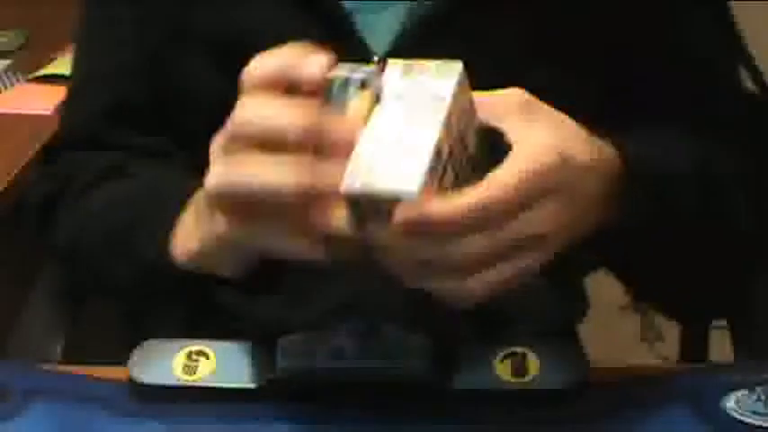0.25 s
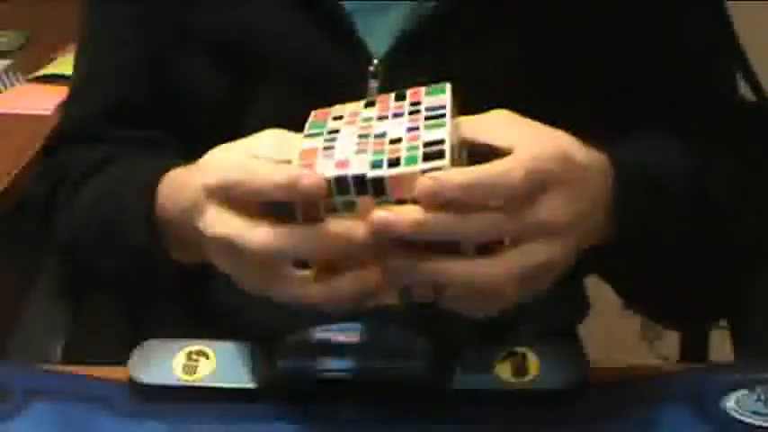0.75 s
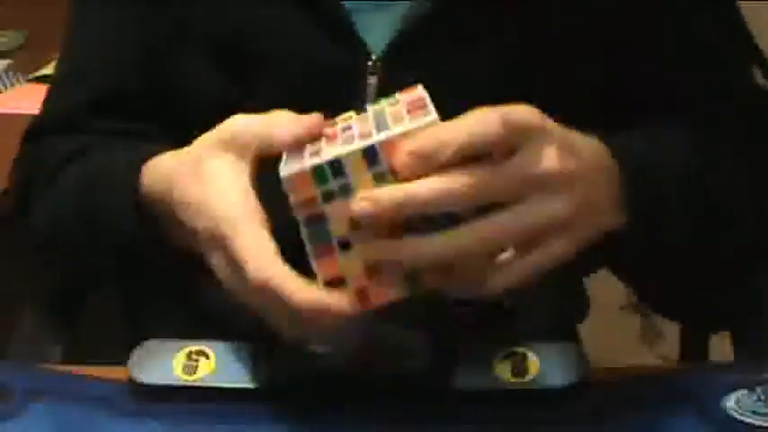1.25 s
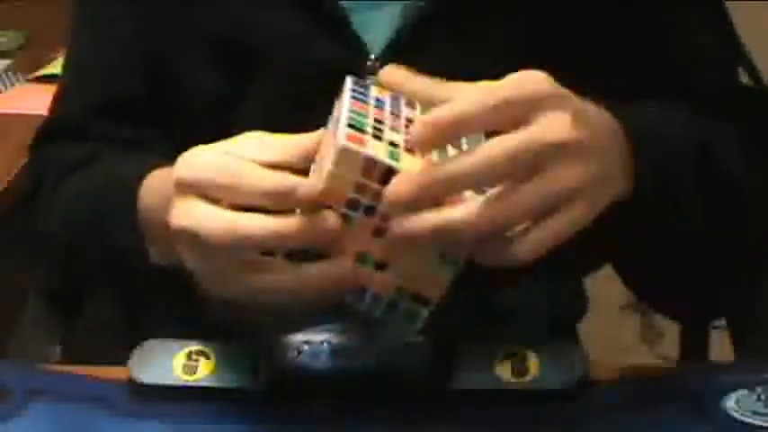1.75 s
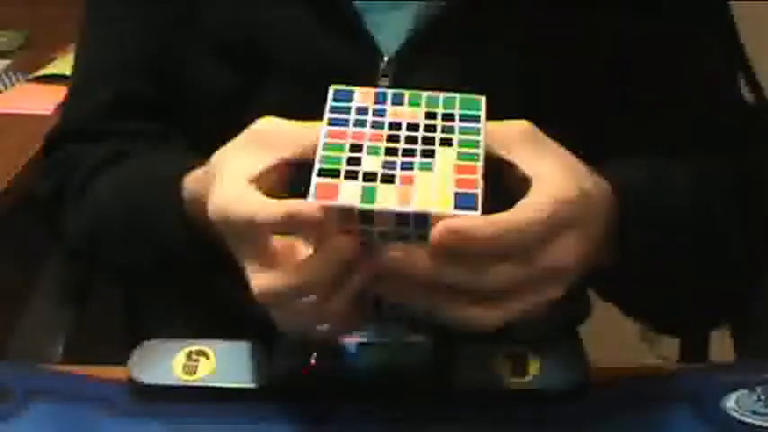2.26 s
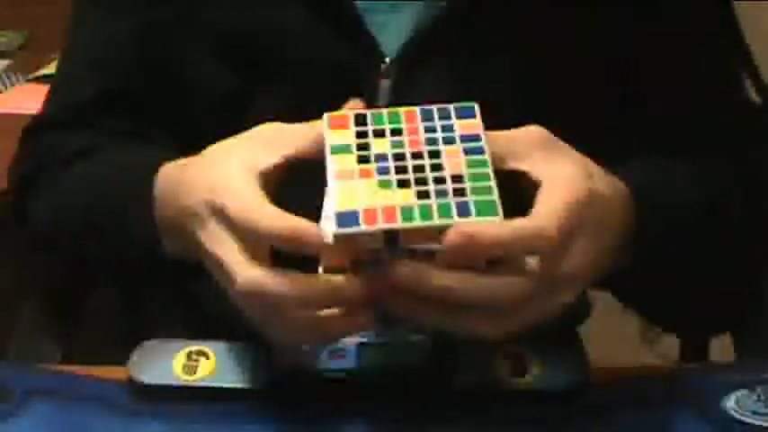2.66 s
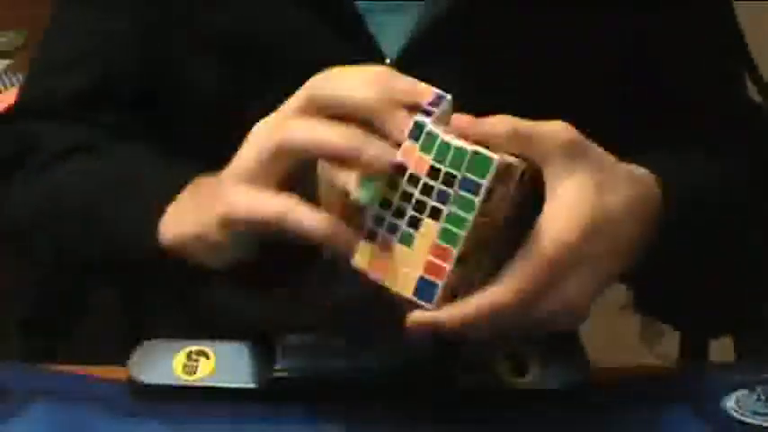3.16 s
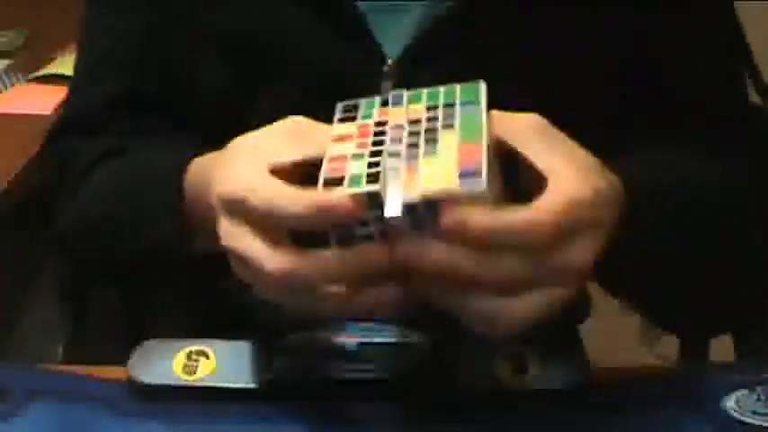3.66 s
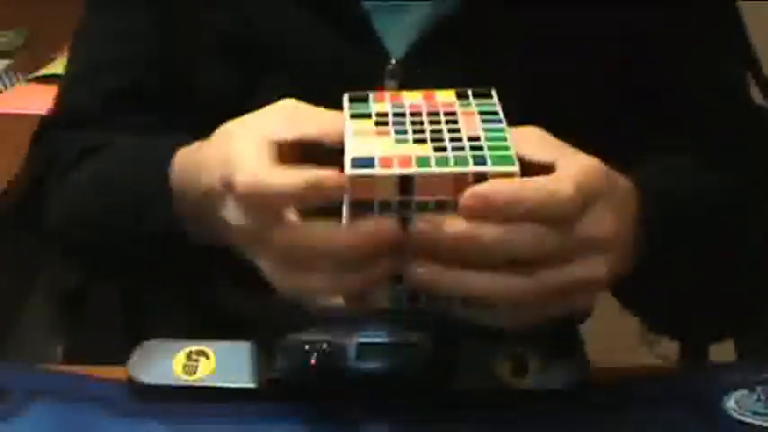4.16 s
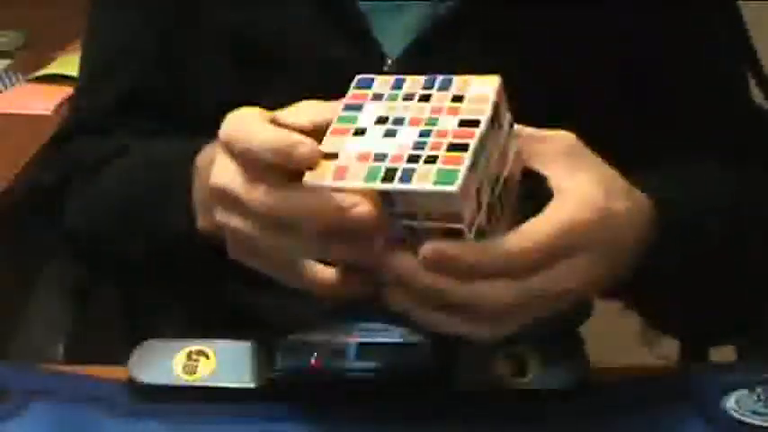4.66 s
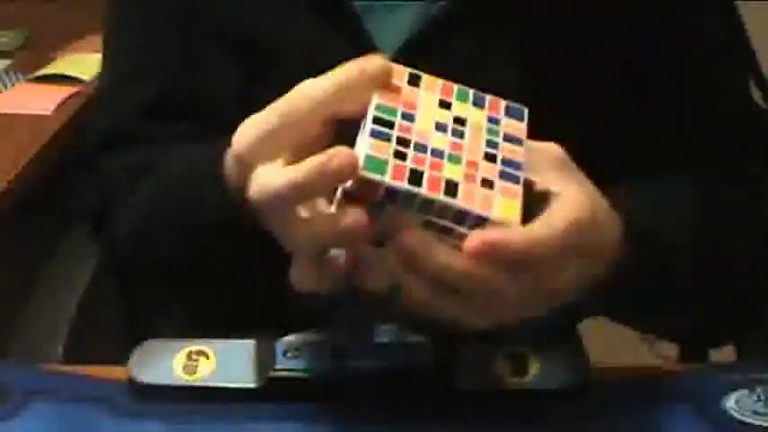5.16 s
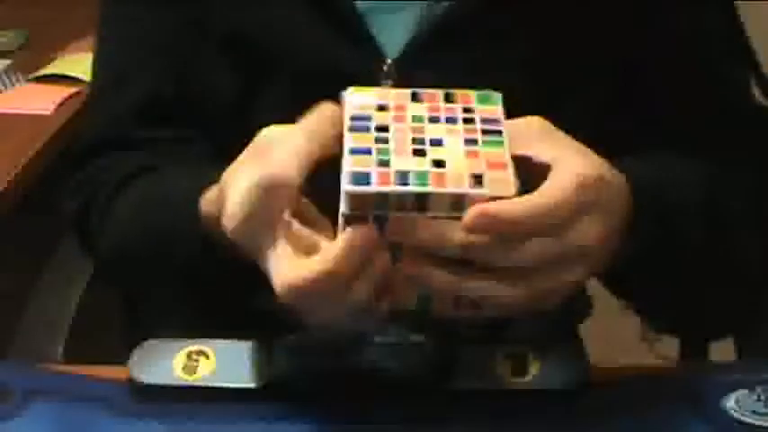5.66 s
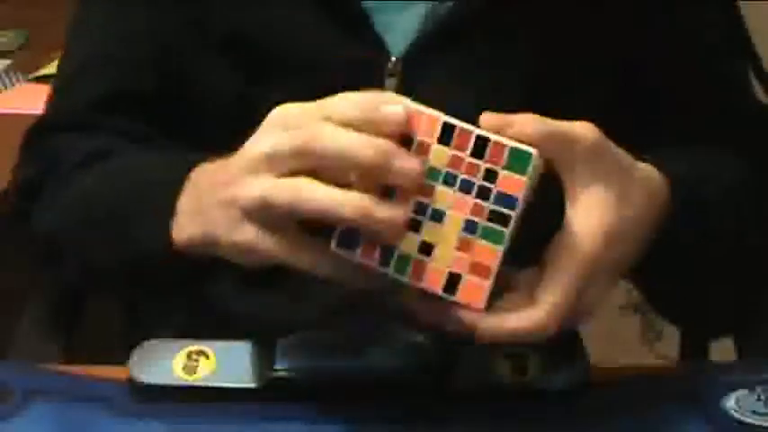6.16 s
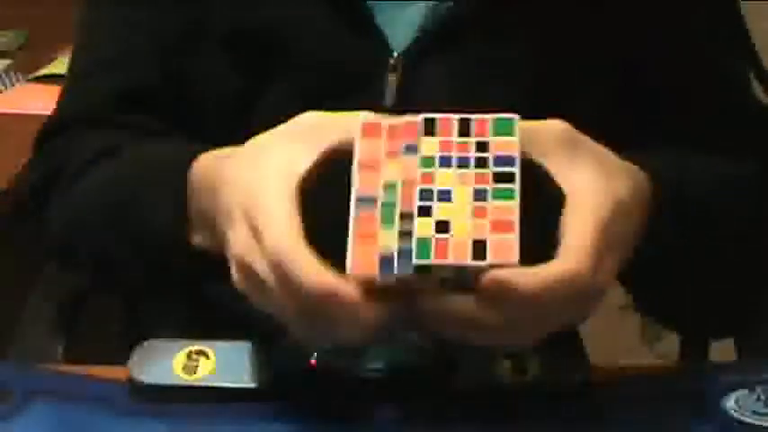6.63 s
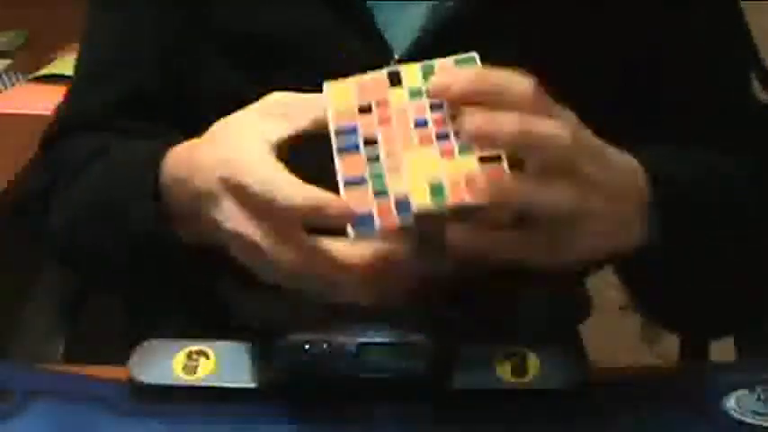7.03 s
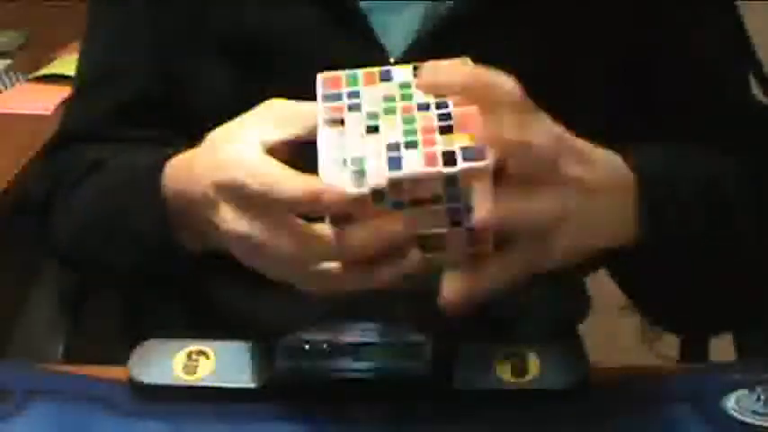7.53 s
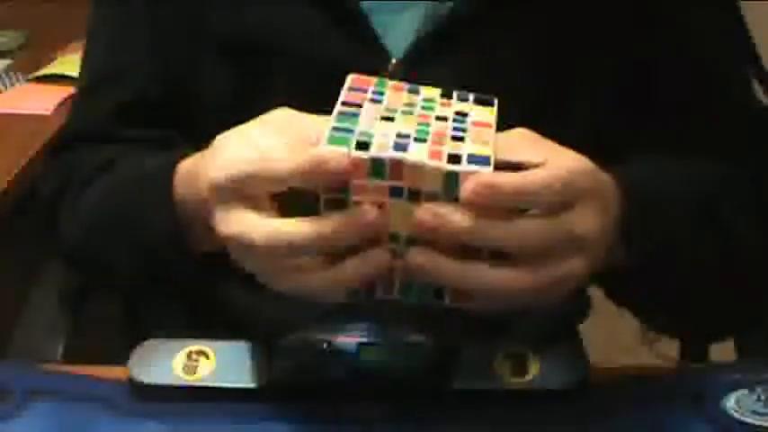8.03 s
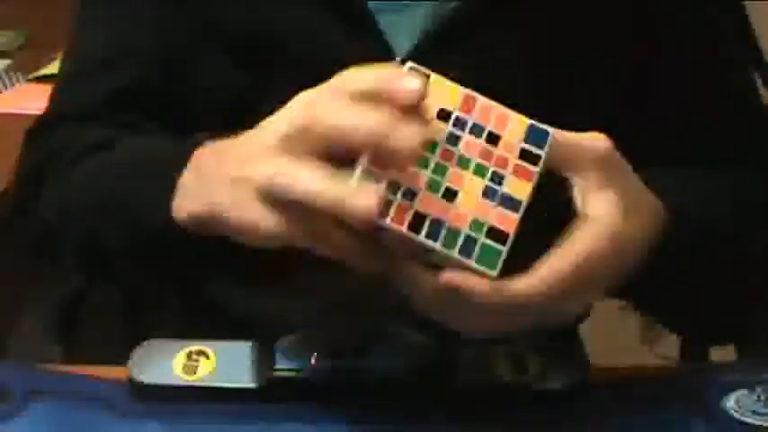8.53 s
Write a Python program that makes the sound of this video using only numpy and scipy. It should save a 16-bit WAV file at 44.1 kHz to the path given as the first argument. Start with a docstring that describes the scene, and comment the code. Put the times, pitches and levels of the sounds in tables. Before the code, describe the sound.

A large hollow plastic puzzle cube is twisted quickly by hand, close to the microphone in a small quiet room with a short reverberation. A dull footstep-like thud on a wooden floor opens the scene; others follow irregularly, mostly fainter, ending after about 5.4 s. From 0.14 s, layers slide with dense grainy rattles, and pieces snap home in dry clicks, strong around 0.6 s and 1.5 s, with paired clacks at 2.5 and 2.9 s. A bright flurry at 3.2-3.5 s holds the hardest snap. More bursts come around 4.1-4.4, 5.2 and 5.5-5.8 s, with short lulls between, then 6.4-6.8 s. From 6.8 to 8.2 s only light, sparse ticks and faint jiggling remain. Two firm snaps follow near 8.5 and 8.8 s, the first brighter, the last duller. Low mains hum and soft, slowly sinking hiss continue throughout.

```python
"""A large plastic puzzle cube is twisted by hand in a small quiet room, over a mains hum and a slowly sinking hiss.
Dull thuds like footsteps on a wooden floor start at once, mostly grow fainter and stop after 5.4 s.
From 0.14 s sliding layers rattle as dense grains and pieces snap home as clicks, the hardest near 3.4 s;
6.8 to 8.2 s brings only light ticks, then two last firm snaps. Grains and clicks ring one bank of cube resonances."""
import sys
import numpy as np
from scipy import signal
from scipy.fft import rfft, irfft
from scipy.io import wavfile
from scipy.ndimage import uniform_filter1d

SR = 44100
rng = np.random.default_rng(int(sys.argv[2]) if len(sys.argv) > 2 else 0)


def elevation(decibels):
    """Turn decibel levels (scalar or array-like) into linear amplitude ratios."""
    levels = np.asarray(decibels, float)
    return 10 ** (levels / 20)


def file_out(sig):
    """Save sig as 16-bit WAV at sys.argv[1]."""
    # one column per channel
    cols = np.atleast_2d(sig).T
    # limit, then scale
    lim = np.clip(cols, -1, 1)
    pcm = np.round(lim * 32767).astype(np.int16)
    wavfile.write(sys.argv[1], SR, pcm)


N = 387638

# Layers turning. Each row: start in seconds, length in seconds before swell and run-out, rattle drive in dB,
# treble in dB against the turn's own middle range.
TURNS = [(0.142, 0.027, -44, 0), (0.226, 0.023, -38, -4), (0.357, 0.081, -23.5, 2.5),
         (0.562, 0.033, -31, -14), (0.719, 0.04, -36, -11), (0.955, 0.055, -39.5, -13),
         (1.062, 0.037, -28, -15), (1.119, 0.029, -32.5, -14), (1.232, 0.0076, -39.5, -4),
         (1.396, 0.022, -39.5, -5), (1.449, 0.085, -33, -1.5), (1.63, 0.025, -23.5, -12),
         (1.846, 0.026, -40.5, -5), (2.046, 0.009, -39, -8), (2.438, 0.044, -34.5, -12),
         (2.473, 0.04, -27.5, -19), (2.624, 0.02, -46, 1), (2.875, 0.034, -24.5, -23),
         (3.195, 0.058, -28, 1), (3.321, 0.03, -31, -1), (3.346, 0.058, -25, 2.5), (3.416, 0.041, -27, 3),
         (3.587, 0.028, -37, 5.5), (3.671, 0.023, -33, -6), (3.786, 0.064, -34, 0), (3.92, 0.037, -39, -11),
         (4.041, 0.018, -32.5, -1.5), (4.122, 0.072, -27.5, -5), (4.251, 0.054, -44, -4),
         (4.358, 0.067, -23, 3), (4.437, 0.034, -29.5, -6), (5.127, 0.05, -44, -9), (5.173, 0.043, -24, -4),
         (5.517, 0.041, -34, -19), (5.545, 0.055, -24, -6), (5.646, 0.012, -45.5, 3),
         (5.74, 0.011, -34.5, -7), (5.761, 0.042, -25, -14), (6.318, 0.032, -43.5, -8),
         (6.369, 0.01, -33, 7.5), (6.482, 0.073, -26.5, -1), (6.681, 0.028, -31, -1.5),
         (6.736, 0.02, -25.5, -2), (6.806, 0.082, -46.0, -17), (7.12, 0.011, -41.5, -16),
         (7.308, 0.0078, -51, -1), (7.546, 0.011, -50, 3), (7.647, 0.028, -42, -0.5),
         (7.932, 0.035, -45.5, -7), (8.282, 0.019, -49.5, -5.0), (8.431, 0.053, -34.5, -2),
         (8.461, 0.042, -26, -21), (8.723, 0.038, -37.5, -1), (8.746, 0.037, -25.5, -4)]


def rms_one(x):
    """Scale to rms 1."""
    return x / np.sqrt(np.mean(x ** 2) + 1e-20)


def at_hz(points, hz):
    """Read a curve of (Hz, value) points on a log-frequency axis."""
    point_hz, value = np.transpose(points)
    return np.interp(np.log(hz), np.log(point_hz), value)


def resonate(x, hz, width_hz):
    """Two-pole resonance, gain near 1 at its peak."""
    r = np.exp(-np.pi * width_hz / SR)
    b = np.array([1, 0, -1]) * (1 - r * r) / 2
    a = [1, -2 * r * np.cos(2 * np.pi * hz / SR), r * r]
    return signal.lfilter(b, a, x)


def dying(times_s, sizes, t60_s):
    """Envelope that jumps at each moment, then decays exponentially."""
    train = np.full(N, 1e-18)
    index = np.clip((np.asarray(times_s) * SR).astype(int), 0, N - 1)
    np.add.at(train, index, sizes)
    return signal.lfilter([1], [1, -elevation(-60 / (t60_s * SR))], train)


def drift(rate_hz):
    """Slow random wander of spread about 1."""
    points_per_s = 40
    count = int(N / SR * points_per_s) + 2
    slow = uniform_filter1d(rng.standard_normal(count), max(1, int(points_per_s / rate_hz)))
    return np.interp(np.linspace(0, count - 1, N), np.arange(count), rms_one(slow))


def sliding_power(levels_db, settle_db, rest_db):
    """Rattle power: each turn swells, holds, runs out and settles; the fingers never quite rest."""
    run_up_t60_s, run_out_t60_s, settle_t60_s = 0.046, 0.065, 1
    power = np.full(N, 1e-18)
    for (start_s, length_s, *_), db in zip(TURNS, levels_db):
        power[int(start_s * SR):int((start_s + length_s) * SR)] += elevation(db) ** 2
    t60_s = np.array([run_up_t60_s, run_out_t60_s, settle_t60_s])
    run_up, run_out, settle = elevation(-2 * 60 / (t60_s * SR))
    # filtered backwards: the layer gathers speed before it bites
    swell = signal.lfilter([1 - run_up], [1, -run_up], power[::-1])[::-1]
    swell = np.abs(uniform_filter1d(swell, 250))
    # loose pieces go on jiggling after a turn
    jiggle = elevation(settle_db) ** 2 * signal.lfilter([1 - settle], [1, -settle], swell)
    return signal.lfilter([1 - run_out], [1, -run_out], swell) + jiggle + elevation(rest_db) ** 2


def turning_layers():
    """Sliding power in the hollow, middle and treble ranges; hollow knock grows a little slower than rattle."""
    # Jiggle against its turn, one value in dB each for hollow, middle, treble.
    settle_db = (-25, -19, -27)
    turn_db, treble_db = np.transpose(TURNS)[2:]
    hollow_db = 1.33 - 0.0258 * (turn_db - turn_db.mean())
    rest_db = -66 + 4 * drift(8)  # fingers shifting on the idle cube
    shades_db = (hollow_db, 0, treble_db)  # against the middle range
    return [sliding_power(turn_db + shade_db, jiggle_db, rest_db)
            for shade_db, jiggle_db in zip(shades_db, settle_db)]


def catching_pieces():
    """Times, levels and tilts of the catches; each caught piece ticks once more, 2 to 12 ms later and weaker."""
    # Each row: time in seconds, drive in dB before shading per resonance,
    # treble tilt in dB, nil at 3.5 kHz, whole from about 11 kHz, reversed in the lows.
    catches = [(0.1396, -24, -1), (0.181, -27, -29), (0.2344, -32, 14), (0.3403, -27, 4), (0.4031, -29, 0),
               (0.442, -20, 1), (0.5772, -27, 18), (0.597, -11, -10), (0.7472, -13.5, -3.5),
               (0.7729, -22, -3), (0.8906, -27, 4), (0.9012, -30.5, 11.5), (1.0684, -16, 5.5),
               (1.115, -17, -9), (1.229, -17.5, 4.5), (1.4551, -30.5, 30.5), (1.474, -32, 30),
               (1.4997, -12, 3), (1.6382, -19, 18.5), (1.6461, -22, 20), (1.8395, -22, -1.5),
               (1.9088, -21, -5), (1.9504, -25, -8), (2.047, -23, 8.5), (2.1273, -32, -14),
               (2.3163, -29, -6), (2.485, -11, -7), (2.501, -9.5, -9), (2.8792, -15, 1), (2.89, -11.5, -6),
               (2.9069, -10, -9), (3.225, -19, 12), (3.2335, -27, 16), (3.2553, -18, -15),
               (3.3047, -29, 10), (3.34, -22, 15), (3.3653, -5, 3), (3.394, -29, 17), (3.4496, -25, 11),
               (3.5779, -32, 7), (3.6119, -24, 10), (3.7625, -24.5, 18.5), (3.921, -28, 5.5),
               (3.936, -24.5, -8), (4.0459, -27.0, 2), (4.1313, -13, -8), (4.17, -17, 2),
               (4.2533, -23.5, 9.5), (4.4793, -26, 11), (4.7095, -30, -12), (5.078, -35, -1),
               (5.183, -7, -11), (5.1932, -7.5, -1), (5.211, -17, -10), (5.4644, -31.5, -10),
               (5.5444, -20, 7), (5.555, -10.5, -3), (5.5646, -10, 2), (5.6541, -22.5, 12.5),
               (5.781, -15, 1), (5.786, -15.5, 0), (5.797, -24, 9), (5.9026, -21, 5), (5.9151, -30, 15.5),
               (6.3014, -35, 1), (6.3581, -23.5, 6), (6.4621, -34, 20), (6.489, -11, 3),
               (6.5104, -10.5, 0.0), (6.5781, -25.5, 13.5), (6.7503, -14.5, 9), (6.7612, -23, 16.5),
               (7.059, -35, -16), (7.126, -28.5, -26), (7.1802, -28.5, -21), (7.3227, -31, -14),
               (7.441, -33.5, -17), (7.5455, -32, -12), (7.6055, -32, 1), (7.6596, -29, 3),
               (7.7519, -31.5, -11), (7.8055, -28.5, -7), (7.818, -32, -9), (7.9617, -31, 1),
               (8.1939, -36, -31), (8.2947, -28.5, -19), (8.3698, -33.5, 11), (8.471, -18.5, 7),
               (8.4774, -10.5, 5.5), (8.759, -28, 24.5), (8.7787, -11.5, -23)]
    at_s, level_db, tilt_db = np.transpose(catches)
    luck = rng.random((len(at_s), 2))
    bounce_at_s = at_s + 0.0046 * (.5 + 2 * luck[:, 0])
    bounce_db = level_db - 9.5 * (.5 + luck[:, 1])
    return np.append(at_s, bounce_at_s), np.append(level_db, bounce_db), np.tile(tilt_db, 2)


def colours(contacts, resonances):
    """Random tilt of spread 1 for each contact, neighbouring resonances alike."""
    return rms_one(uniform_filter1d(rng.standard_normal((contacts, resonances)), size=3, axis=1))


def cube():
    """Each contact is a few milliseconds of chatter, driving each resonance with a strength of its own."""
    # Resonances of the body. Each row: centre in Hz, width in Hz, gain in dB.
    resonances = [(446, 110, -24), (601, 59, -1), (696, 191, 5), (881, 130, 0.5), (1404, 290, -40),
                  (1747, 390, 0), (2213, 226, 1), (3046, 960, 0), (3910, 1400, 2), (5700, 1720, 0),
                  (7110, 940, -2), (8700, 2620, 0), (10920, 1570, -0.5), (13500, 1200, -43)]
    hollow_below_hz, treble_above_hz = 1000, 6000
    hollow, middle, treble = turning_layers()
    click_at_s, click_db, click_tilt_db = catching_pieces()
    grain_at_s = rng.random(3200) * N / SR
    grain_db = 4 * np.minimum(rng.exponential(1, len(grain_at_s)), 2.6)
    grain_colour = colours(len(grain_at_s), len(resonances))
    click_colour = colours(len(click_at_s), len(resonances))
    # a click's hollowness follows that of the turn around it
    click_index = np.minimum(click_at_s * SR, N - 1).astype(int)
    knock_db = 10 * np.log10(hollow / middle)[click_index] - 4.0
    chatter = rng.standard_normal((2, N))
    rub = elevation(-2.0)  # smooth friction between the faces
    out = np.zeros(N)
    for k, (hz, width_hz, gain_db) in enumerate(resonances):
        is_hollow, is_low = hz < hollow_below_hz, hz < 2500
        slide = hollow if is_hollow else treble if hz > treble_above_hz else middle
        slide = slide * elevation(2 * 2.0 * drift(12))  # the grip keeps changing which resonance speaks

        tilt_share = np.clip(np.log2(hz / 3500) / 1.66, -.5, 1)
        shade_db = knock_db * is_hollow + click_tilt_db * tilt_share
        shade_db = shade_db + 3.2 * click_colour[:, k] - 8 * is_low
        clicks = dying(click_at_s, elevation(click_db + shade_db + 0.5), t60_s=0.0093)

        grain_shade_db = 6.48 * grain_colour[:, k] - 3.15 * is_low
        grains = dying(grain_at_s, elevation(grain_db - 3.5 + grain_shade_db), t60_s=0.0097)

        drive = np.sqrt(clicks ** 2 + slide * (grains ** 2 + rub ** 2)) * chatter[k % 2]
        if is_hollow:  # the air inside rings in a sharply bounded band
            drive = resonate(drive, hz, 2 * width_hz)
        out += elevation(gain_db) * resonate(drive, hz, width_hz)
    # a small body radiates no bass
    return signal.sosfilt(signal.butter(4, 380, "high", fs=SR, output="sos"), out)


def room(x):
    """Dense tail of reflections, different in each channel, the treble dying first."""
    # Each row: frequency in Hz, reverberation time T60 in seconds.
    t60_curve = [(500, 0.44), (2000, 0.37), (5000, 0.25), (9000, 0.21), (15000, 0.125)]
    t_s = np.arange(SR // 2) / SR
    edges_hz = np.geomspace(250, 18000, num=10)
    noise = rng.standard_normal((2, 2, len(t_s)))
    echo = 0
    for k, (low_hz, high_hz) in enumerate(zip(edges_hz, edges_hz[1:])):
        sos = signal.butter(2, [low_hz, high_hz], "band", fs=SR, output="sos")
        band = signal.sosfilt(sos, noise[k % 2])
        t60_s = at_hz(t60_curve, np.sqrt(low_hz * high_hz))
        echo = echo + band * elevation(-60 * t_s / t60_s) * (t_s > .002)
    # furniture soaks up the lows
    echo = echo - 0.32 * signal.sosfilt(signal.butter(1, 1500, fs=SR, output="sos"), echo)
    echo = echo / np.sqrt(np.sum(echo ** 2, axis=1, keepdims=True))
    return signal.fftconvolve(x[None], echo, axes=1)[:, :N]


def thuds():
    """Each far footfall shakes the floor boards with a resonant rumble that swells and dies."""
    # Each row: time in seconds, impulse in dB before smoothing.
    footfalls = [(0, -39.5), (.26, -49), (.72, -46), (1.31, -41), (1.6, -54.5), (1.99, -46.5), (2.56, -49),
                 (3.38, -49.5), (3.75, -53), (4.05, -54), (5.38, -53.5)]
    # Board resonances. Each row: centre in Hz, width in Hz, relative gain in dB.
    boards = [(27, 7.8, 3.5), (61, 41, 2), (106.5, 14, 10), (189.5, 23, 6), (238, 44, -11.5)]
    at_s, level_db = np.transpose(footfalls)
    weight = dying(at_s, elevation(level_db), t60_s=0.69)
    shake = signal.lfilter([.0006], [1, -.9997], weight) * elevation(3.9 * drift(14))
    noise = rng.standard_normal((2, N))
    rumble = sum(elevation(gain_db) * resonate(noise[k % 2], hz, width_hz)
                 for k, (hz, width_hz, gain_db) in enumerate(boards))
    return shake * rms_one(signal.sosfilt(signal.butter(4, 290, fs=SR, output="sos"), rumble))


def hum():
    """Sines at mains harmonics whose levels waver."""
    # Each row: frequency in Hz, rms level in dB about which it wavers.
    harmonics = [(120.0, -62.5), (180.0, -63.5)]
    t_s = np.arange(N) / SR
    return sum(np.sqrt(2) * elevation(db + 3.0 * drift(6)) * np.sin(2 * np.pi * (hz * t_s + rng.random()))
               for hz, db in harmonics)


def hiss():
    """Coloured noise, partly alike in both channels, sinking slowly."""
    # Each row: frequency in Hz, relative density in dB per Hz.
    spectrum = [(12, -43), (20, -5), (118, -6.5), (384, -14), (495, -13), (893, -18), (1480, -16),
                (15300, -30), (16700, -19.5)]
    # Each row: frequency in Hz, left-right likeness from 0 to 1.
    likeness = [(60, 1), (380, 0.41), (2380, 0.18), (15000, 0.86)]
    hz = np.maximum(np.fft.rfftfreq(N, 1 / SR), 1)
    alike = np.clip(at_hz(likeness, hz), 0, 1)
    mid, side = rfft(rng.standard_normal((2, N))) * elevation(at_hz(spectrum, hz))
    pair = np.sqrt(1 + alike) * mid + np.sqrt(1 - alike) * side * [[1], [-1]]
    level_db = -52.5 + np.linspace(1.5, -1.5, N)
    return elevation(level_db) * rms_one(irfft(pair, N))


def scene():
    """Cube in the middle with its room, over thuds, hum and hiss."""
    near = cube()
    return near + elevation(-10) * room(near) + thuds() + hum() + hiss()


def top_cut(x):
    """Nothing passes above the cut-off."""
    return signal.sosfilt(signal.butter(12, 16820, fs=SR, output="sos"), x)


def record(dry):
    """Soft saturation rounds the loudest peaks, then a steep low-pass cuts the top."""
    ceiling = .75
    rounded = ceiling * np.tanh(dry / ceiling)
    low_pass = signal.cheby2(12, 40, 16100, fs=SR, output="sos")  # 40 dB down from 16.1 kHz
    mix = signal.sosfilt(low_pass, rounded)
    return top_cut(mix)


dry = scene()
out = record(dry)
file_out(out)
```